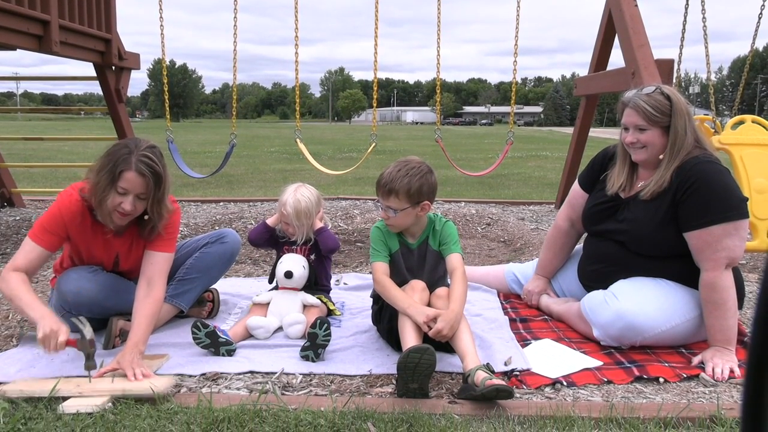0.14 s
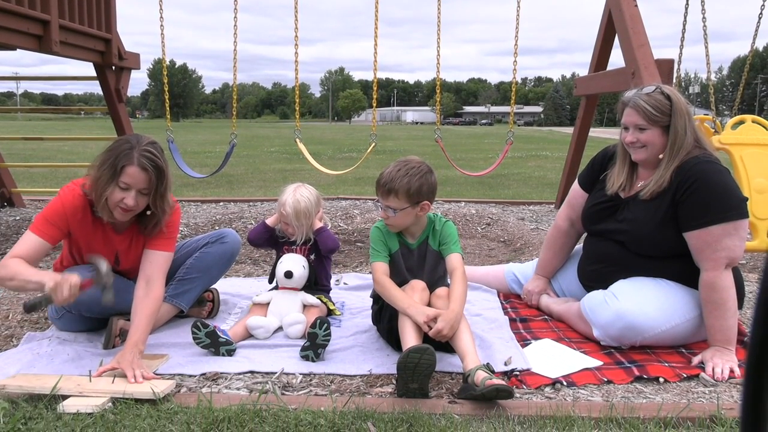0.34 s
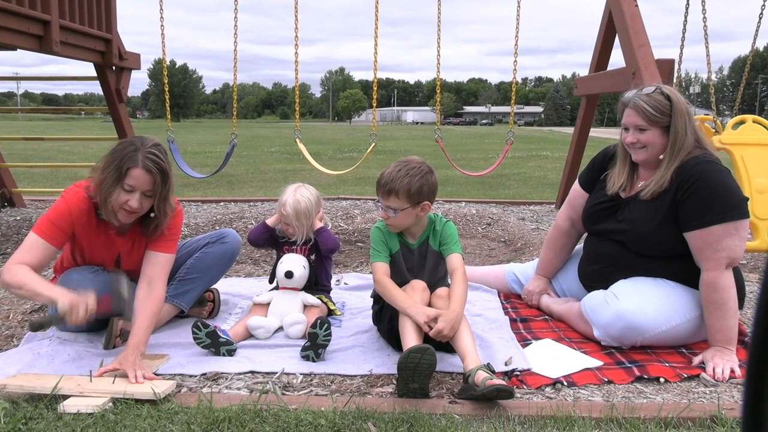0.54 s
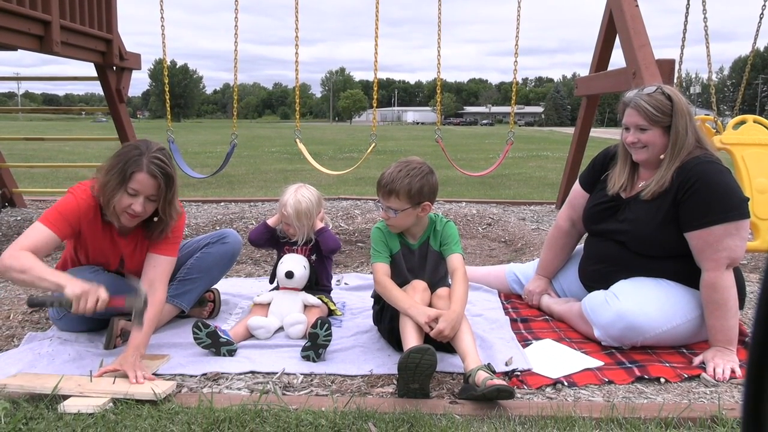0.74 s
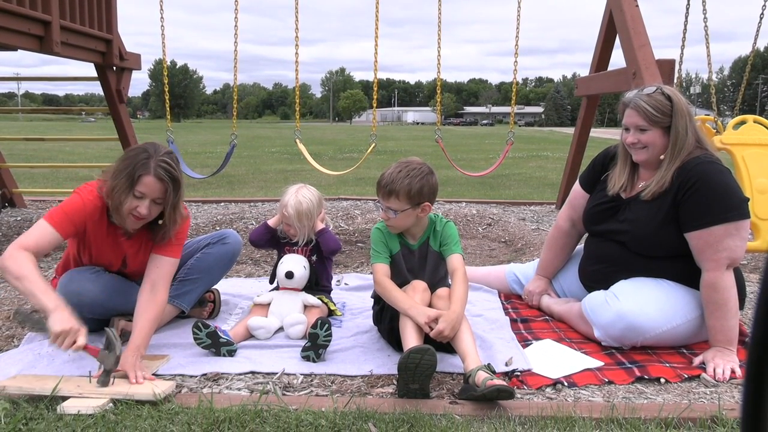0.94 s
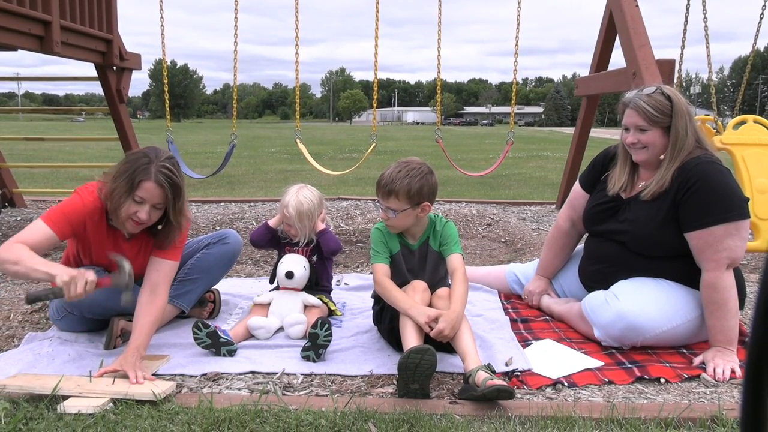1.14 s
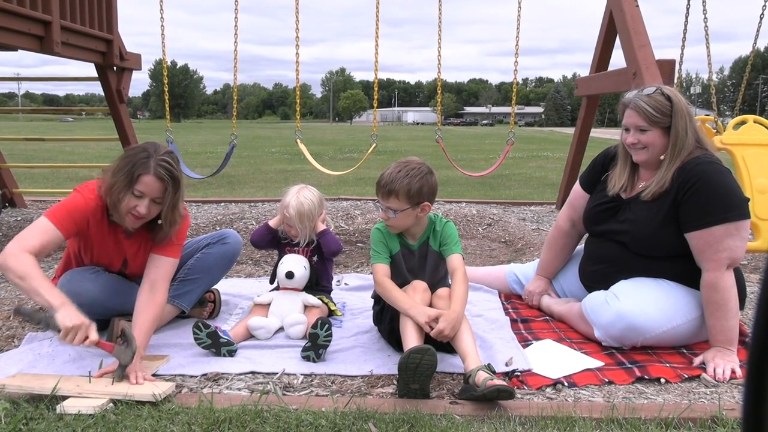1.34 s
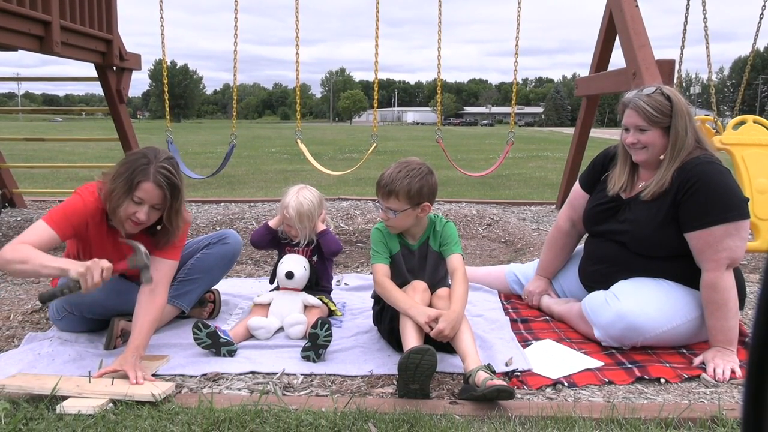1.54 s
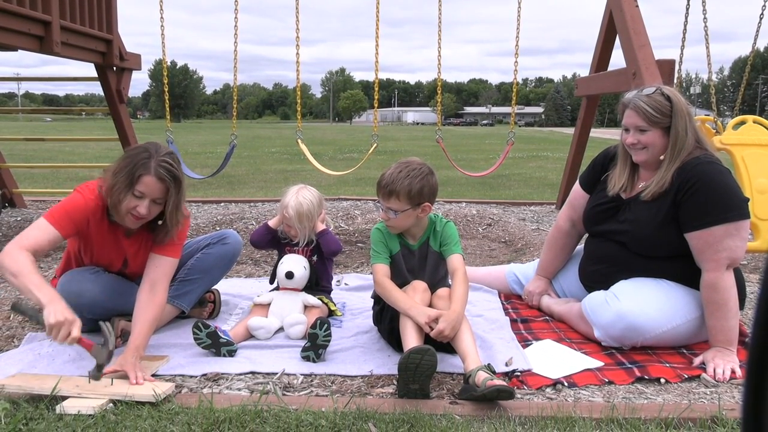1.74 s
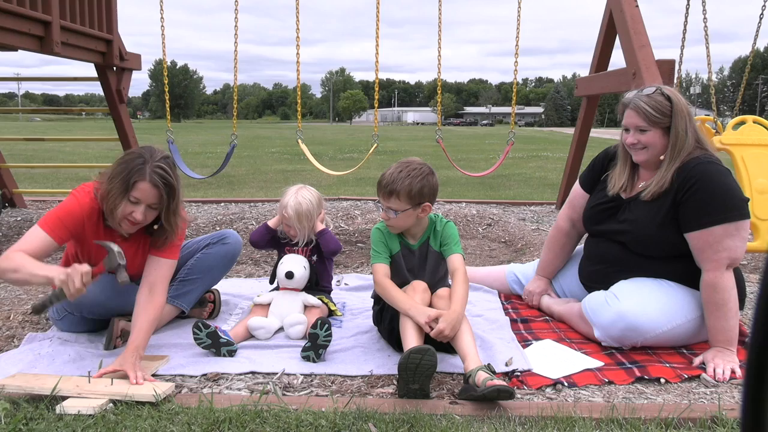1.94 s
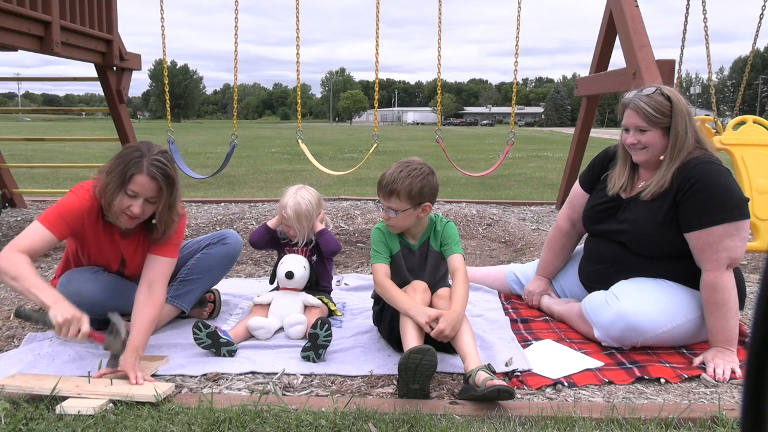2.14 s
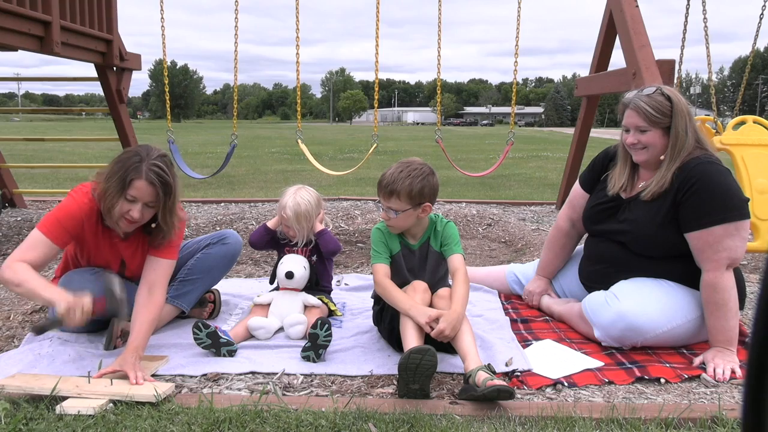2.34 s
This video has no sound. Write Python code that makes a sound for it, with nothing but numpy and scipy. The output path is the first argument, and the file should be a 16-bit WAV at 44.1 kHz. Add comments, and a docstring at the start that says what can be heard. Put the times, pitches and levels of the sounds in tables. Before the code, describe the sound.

A hammer pounds a nail into a loose board on the ground, the first blow thudding and rattling most, later ones ringing brighter; quiet outdoor rumble and hiss, louder and distorted on the right.

```python
"""Hammer blows drive a nail into a loose board lying on the ground outdoors; the board jumps and claps back.
Steel and wood are decaying modes rung by a chattering contact; the nail, the ground thump and lingering
board tones are decaying sines; crack, rattle, swing rustle and the far wall's echoes are shaped noise.
Low rumble and hiss lie beneath, louder as clothes and arm rustle in each swing; a thin whistle fills some gaps.
Two microphones: the right one is close and overloads hard, the left one is a metre further off."""
import sys
import numpy as np
from scipy import signal
from scipy.fft import rfft, irfft
from scipy.io import wavfile
from scipy.ndimage import uniform_filter1d

SR = 44100
rng = np.random.default_rng(int(sys.argv[2]) if len(sys.argv) > 2 else 0)


def to_wav(s):
    """Save 16-bit WAV."""
    ch = np.atleast_2d(s).T  # columns
    pcm = np.round(np.clip(ch, -1, 1) * 32767)  # PCM
    wavfile.write(sys.argv[1], SR, pcm.astype(np.int16))


def gain_from_db(level_db):
    """Turn a decibel level (scalar or array-like) into a linear amplitude factor."""
    decades = np.asarray(level_db, float) / 20
    return 10 ** decades


N = 105840
EVENT_T_S = np.arange(8192) / SR  # time axis of every single event
LEFT_LATE_S, LEFT_DB = .0031, -8  # left microphone against right


def fade(t, t60_s):
    """Exponential decay: silence before zero, then 60 dB down in t60_s."""
    return (t >= 0) * np.exp(-np.log(1000) * np.maximum(t, 0) / t60_s)


def decaying_sine(hz, t, t60_s):
    """One damped resonance."""
    return np.sin(2 * np.pi * hz * t) * fade(t, t60_s)


def noise(points, size):
    """Noise of rms 1, its spectrum interpolated over log frequency from (frequency [Hz], level [dB])."""
    hz, db = np.array(points).T
    f = np.maximum(np.arange(size // 2 + 1) * SR / size, 1)
    gain = gain_from_db(np.interp(np.log(f), np.log(hz), db))
    x = irfft(rfft(rng.standard_normal(size)) * gain, size)
    return x / x.std()


def walk(rate_hz):
    """Smooth random drift with spread near 1: random steps smoothed twice."""
    k = int(SR / rate_hz)
    steps = np.repeat(rng.standard_normal(N // k + 1), k)
    return 1.3 * uniform_filter1d(uniform_filter1d(steps, k), k)[:N]


def add(out, x, s):
    """Mix x into out at s seconds."""
    i = int(s * SR)
    out[i:i + len(x)] += x[:len(out) - i]


def add_at_microphones(out, left, right, s, left_db=LEFT_DB):
    """The left microphone hears the event later and weaker."""
    add(out[0], gain_from_db(left_db) * left, s + LEFT_LATE_S)
    add(out[1], right, s)


SCATTER_DB, DETUNE = 2.0, .02  # random spread of mode level; of mode frequency as a fraction
SHARED = .5  # power share of the contact chatter common to both microphones
EMPHASIS_DB, EMPHASIS_OCTAVES = 7, 0.66  # lift of the modes near centre_hz


def ring(modes, t, contact_s, centre_hz=None):
    """A chattering contact rings the modes; each microphone hears its own balance."""
    hz, t60_s, left_db, right_db = np.array(modes).T[:, :, None]
    chance = rng.standard_normal((4, len(hz), 1))
    waves = decaying_sine(hz * (1 + DETUNE * chance[0]), np.maximum(t, 0), t60_s) * (t >= 0)
    chatter = rng.standard_normal((3, 1024))
    push_t_s = np.arange(1024) / SR
    u = push_t_s / contact_s
    shape = (1 - np.exp(-6.0 * u - .2)) * np.exp(-u)
    shape_norm = np.sqrt((shape ** 2).sum())
    lift_db = 0
    if centre_hz:
        lift_db = EMPHASIS_DB * np.exp(-(np.log2(hz / centre_hz) / EMPHASIS_OCTAVES) ** 2)
    out = []
    for c, db in enumerate((left_db, right_db)):
        push = (np.sqrt(SHARED) * chatter[2] + np.sqrt(1 - SHARED) * chatter[c]) * shape
        # partly even out how strongly this push happens to drive each mode
        drive = np.abs(np.exp(-2j * np.pi * hz * push_t_s) @ push)[:, None]
        push = push / drive ** .7
        scatter_db = SCATTER_DB * (chance[1] + .5 * chance[2 + c])
        gain = gain_from_db(db + lift_db + scatter_db) / shape_norm ** .3
        out.append(signal.fftconvolve(gain * waves, push, axes=1).sum(axis=0)[:len(t)])
    return signal.sosfilt(signal.butter(2, 130, "high", fs=SR, output="sos"), out)


# modes of hammer and nail steel: (nominal frequency [Hz], t60 [s], left level [dB], right level [dB])
STEEL_MODES = [(3310, .025, -9.5, -11), (3750, 0.015, -4, -9.5), (4270, 0.024, -8, -8.5),
               (4880, .02, -4, -4), (5414, 0.016, -11, -10.5), (6320, .012, -14, -9),
               (7640, 0.014, -16, -4.5), (9600, 0.0092, -12.5, -12), (10140, 0.0063, -12, -12.5),
               (11400, 0.01, -13.5, -12.5)]
# modes of the board: (nominal frequency [Hz], t60 [s], left level [dB], right level [dB])
WOOD_MODES = [(205, 0.031, -8.5, -7), (239, .04, -8, -5), (300, 0.045, -9, -9), (550, .04, -5, -8),
              (682, 0.025, -22.5, -15.5), (864, .04, -6, -6.5), (1093, 0.05, -2.5, -7.5),
              (1300, 0.028, -3.5, -9.5), (1460, 0.052, -7, -12.5), (1562.6, 0.03, -2, -3),
              (1812, 0.038, -3.5, -5), (2042, 0.049, -6.5, -9), (2374, .025, -12, -10.5),
              (2900, 0.022, -15, -13)]
# spectrum of the impact crack: (frequency [Hz], level [dB])
CRACK_SPECTRUM = [(100, -30.5), (700, -5.5), (1500, -2), (3000, -3.5), (4500, -3.5), (7000, -6),
                  (11000, -7.5), (16000, -14)]
STEEL_CONTACT_S, WOOD_CONTACT_S = .002, .003  # decay constants of the chatter
CRACK_DB, CRACK_T60_S = -5.5, 0.03  # level against the steel


def contact(t, steel_db, wood_db, centre_hz, late_s, rise_s):
    """An impact: steel ring, a broad crack and the wood's knock."""
    crack = np.array([noise(CRACK_SPECTRUM, len(t)) for _ in range(2)])
    crack = crack * fade(t, CRACK_T60_S) * (1 - np.exp(-t / rise_s))
    steel = ring(STEEL_MODES, t, STEEL_CONTACT_S) + gain_from_db(CRACK_DB) * crack
    wood = ring(WOOD_MODES, t - late_s, WOOD_CONTACT_S, centre_hz) / 2
    return gain_from_db(steel_db) * steel + gain_from_db(wood_db) * wood


def nail(t, hz, db):
    """The nail rings as one decaying sine with a soft 1 ms onset."""
    return gain_from_db(db) * decaying_sine(hz, t, 0.025) * (1 - np.exp(-t / 0.001))


THUMP_HZ, THUMP_T60_S = 44, .11  # right
THUMP_LEFT_HZ, THUMP_LEFT_DB = 153, -14  # level against right


def thump(u, db):
    """The ground's thud: a low decaying sine, higher and shorter on the left."""
    left = gain_from_db(db + THUMP_LEFT_DB) * decaying_sine(THUMP_LEFT_HZ, u, THUMP_T60_S / 2)
    return np.array([left, -gain_from_db(db) * decaying_sine(THUMP_HZ, u, THUMP_T60_S)])


# spectrum of the rattle: (frequency [Hz], level [dB])
RATTLE_SPECTRUM = [(40, -26), (180, 4.5), (500, 11.5), (1500, 1.5), (3000, -3), (4700, -2), (6000, -14.5),
                   (11000, -17.5), (16000, -26)]
RATTLE_T60_S, RATTLE_FLUTTER_DB, RATTLE_LEFT_DB = 0.14, 3.0, 3.5


def rattle(t, db, ends_s):
    """Loose board and gravel: fluttering noise that decays, then drops away around ends_s."""
    out = []
    for side_db in (RATTLE_LEFT_DB, 0):
        flutter = gain_from_db(db + side_db + RATTLE_FLUTTER_DB * walk(300)[:len(t)])
        envelope = fade(t, RATTLE_T60_S) / (1 + (t / ends_s) ** 4.5)
        out.append(flutter * noise(RATTLE_SPECTRUM, len(t)) * envelope)
    return np.array(out)


# hammer blows: (time [s], steel level [dB], nail frequency [Hz], nail level [dB], wood level [dB],
# wood emphasis frequency [Hz], wood delay [s])
BLOWS = [(.2040, 7.5, 3296, 6, 7.5, 704, .0005), (0.6441, 5.5, 4385, 12.5, 1.5, 1609, .002),
         (1.0009, 1.5, 4800, 0.5, 8.5, 601.3, .0055), (1.3590, 6, 4382, 13.5, 2, 1300, .001),
         (1.731, 6.5, 4649, 14, 2.5, 1599, .001), (2.1055, 7, 4364, 14.5, 2.5, 1600, .001)]
# what follows each blow: (ground thump level [dB], rattle level [dB], rattle end [s], echo level [dB])
AFTER_BLOW = [(-0.5, -11.5, 0.093, -58), (-15, -19, 0.066, -58.5), (-18.5, -18, 0.063, -63),
              (-19.5, -18, 0.056, -57.5), (-16.5, -17, 0.023, -56), (-18.5, -14.5, .055, -57)]


def blows():
    """Each blow sums impact, nail ring, ground thump and rattle."""
    out, t = np.zeros((2, N)), EVENT_T_S
    for blow, (thump_db, rattle_db, ends_s, _) in zip(BLOWS, AFTER_BLOW):
        s, steel_db, nail_hz, nail_db, wood_db, wood_hz, late_s = blow
        x = contact(t, steel_db, wood_db, wood_hz, late_s, 0.00024)
        x += nail(t, nail_hz, nail_db)
        x += thump(t - late_s, thump_db)
        x += rattle(t, rattle_db, ends_s)
        add_at_microphones(out, x[0], x[1], s)
    return out


# the board claps back down: (time [s], steel level [dB], wood level [dB])
BOUNCES = [(.2285, -18.5, -13), (.2390, -27.5, -24), (.2490, -22, -18), (0.674, -28.5, -22),
           (1.0430, -38, -29), (1.3850, -20, -17), (1.4200, -49, -25), (1.7530, -27, -22.5),
           (1.7710, -36, -28), (2.1240, -18.5, -21.5)]
LEFT_BOUNCE_DB = -4  # on top of LEFT_DB


def bounces():
    """The falling board makes weaker impacts with a softer crack onset."""
    out = np.zeros((2, N))
    for s, steel_db, wood_db in BOUNCES:
        x = contact(EVENT_T_S, steel_db, wood_db, 900, 0, .0015)
        add_at_microphones(out, x[0], x[1], s, LEFT_DB + LEFT_BOUNCE_DB)
    return out


# lingering board tones: (time [s], frequency [Hz], level [dB], t60 [s])
LINGERING_TONES = [(.25, 1460, -33.5, 0.23), (.25, 848, -39.5, 0.2), (.66, 1850, -44.5, .15),
                   (1.02, 1485, -45.5, .15), (1.385, 550, -29, 0.18), (1.75, 550, -39.5, 0.17),
                   (2.125, 550, -35, 0.17)]


def lingering_tones():
    """Single board resonances die away slowly as decaying sines."""
    out = np.zeros((2, N))
    for s, hz, db, t60_s in LINGERING_TONES:
        x = gain_from_db(db) * decaying_sine(hz, EVENT_T_S, t60_s)
        add_at_microphones(out, x, x, s, -6.5)
    return out


# spectrum of the main echo: (frequency [Hz], level [dB])
ECHO_SPECTRUM = [(200, -7), (1000, -1.5), (2300, 2.5), (3300, -4), (4500, 0), (6000, -8.5), (9000, -14),
                 (14000, -26.5)]
# spectrum of the early echo: (frequency [Hz], level [dB])
EARLY_ECHO_SPECTRUM = [(1500, -27), (3300, -4), (4500, 0.5), (6000, -7), (9000, -29.5)]
ECHO_S, ECHO_T60_S, ECHO_DB = .109, .38, [0, -5]  # levels: left, right
EARLY_ECHO_S, EARLY_T60_S, EARLY_ECHO_DB = .087, .08, [-11, -5]


def echoes():
    """A far wall returns each blow as decaying noise: a short early echo, then a slap with a tail."""
    out, t = np.zeros((2, N)), EVENT_T_S
    slap = fade(t, ECHO_T60_S) + .6 * fade(t, .015)
    for (s, *_), (*_, echo_db) in zip(BLOWS, AFTER_BLOW):
        for c in range(2):
            main = gain_from_db(ECHO_DB[c] + echo_db) * noise(ECHO_SPECTRUM, len(t)) * slap
            early = gain_from_db(EARLY_ECHO_DB[c] + echo_db) * noise(EARLY_ECHO_SPECTRUM, len(t))
            add(out[c], main, s + ECHO_S)
            add(out[c], early * fade(t, EARLY_T60_S), s + EARLY_ECHO_S)
    return out


# spectrum of the swing's rustle and swish: (frequency [Hz], level [dB])
SWING_SPECTRUM = [(300, -11), (1000, -3.5), (2000, -2), (3300, -4), (4600, 1.5), (5400, -10), (9000, -16),
                  (16000, -25)]
SWING_DB, SWING_RISE_S = [-67, -63.5], .12  # left, right; time constant


def swings():
    """The swing's rustle and swish: noise rising exponentially until the blow."""
    out, t = np.zeros((2, N)), EVENT_T_S
    for s, *_ in BLOWS:
        for c in range(2):
            x = gain_from_db(SWING_DB[c]) * noise(SWING_SPECTRUM, len(t)) * np.exp(-t / SWING_RISE_S)[::-1]
            add(out[c], x, s - len(t) / SR)
    return out


# spectrum of low rumble and hiss: (frequency [Hz], relative density [dB])
RUMBLE_HISS_SPECTRUM = [(15, -31), (25, 1.5), (133, -1.5), (261, -17), (954, -23), (1220, -25.5),
                        (2450, -32.5), (2730, -38), (4440, -36), (5360, -42), (15800, -51.5)]
# rise as clothes and arm rustle in each swing: (level [dB])
RUSTLE_DB = [6, 2, 5, 3, 5, 5]
RUSTLE_RISE_S = 0.16  # time constant
RUMBLE_HISS_DB = [-51.5, -55]  # left, right
BASS_TILT_DB = 0.5  # extra bass on the right per octave under 200 Hz


def rumble_and_hiss(t):
    """Low rumble and hiss, independent per side; clothes and arm rustle louder as each swing comes down."""
    rise_db = np.zeros(len(t))
    for db, (s, *_) in zip(RUSTLE_DB, BLOWS):
        rise_db += db * np.exp(np.minimum(t - s, 0) / RUSTLE_RISE_S) * (t < s + .02)
    right = [(hz, db + BASS_TILT_DB * max(np.log2(200 / hz), 0)) for hz, db in RUMBLE_HISS_SPECTRUM]
    out = []
    for c, points in enumerate((RUMBLE_HISS_SPECTRUM, right)):
        x = noise(points, N)
        rumble = signal.sosfilt(signal.butter(2, 200, fs=SR, output="sos"), x)
        hiss = x - rumble
        # rumble drifts slowly, hiss faster
        drifting = rumble * gain_from_db(1.0 * walk(5)) + hiss * gain_from_db(.8 * walk(16))
        out.append(gain_from_db(RUMBLE_HISS_DB[c] + rise_db) * drifting)
    return np.array(out)


# thin whistle, a bird or a squeaking chain: (time [s], frequency [Hz], level [dB])
WHISTLE_TRACK = [(.46, 3400, -89.5), (.5, 3380, -64), (.6, 3350, -76), (.64, 3350, -90), (0.789, 3750, -85),
                 (.82, 3560, -68), (.86, 3450, -65.5), (0.991, 3420, -62), (1.1, 3400, -80.5),
                 (1.17, 3400, -76), (1.2, 3400, -68), (1.28, 3380, -71), (1.34, 3380, -90)]
WHISTLE_RIGHT_DB = -9.5  # against left


def whistle(t):
    """A sine wavering in pitch and level, finely pulsed near 75 Hz; the right hears it 60 samples later."""
    s, hz, db = np.array(WHISTLE_TRACK).T
    f = np.interp(t, s, hz) + 22 * walk(120)
    pulse_hz = 75 + 8.0 * walk(18)
    pulse = 1 + .6 * np.sin(2 * np.pi * np.cumsum(pulse_hz) / SR)
    level = gain_from_db(np.interp(t, s, db, -120, -120) + 2.5 * walk(100))
    x = np.sin(2 * np.pi * np.cumsum(f) / SR) * pulse * level
    return np.array([x, gain_from_db(WHISTLE_RIGHT_DB) * np.roll(x, 60)])


def scene():
    """Hammering over the outdoor background."""
    t = np.arange(N) / SR
    hammering = blows() + bounces() + lingering_tones() + echoes() + swings()
    return hammering + rumble_and_hiss(t) + whistle(t)


def band_limit(x):
    """A steep low-pass at the top of the band."""
    return signal.sosfilt(signal.butter(12, 15920, fs=SR, output="sos"), x)


CEILING, KNEE = 0.98, 5.5  # full-scale limit; higher knee = harder bend


def record(dry):
    """The inputs overload and flatten the peaks."""
    x = dry / CEILING
    mix = CEILING * x / (1 + np.abs(x) ** KNEE) ** (1 / KNEE)
    return band_limit(mix)


dry = scene()
out = record(dry)
to_wav(out)
```